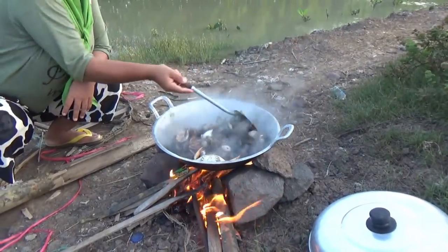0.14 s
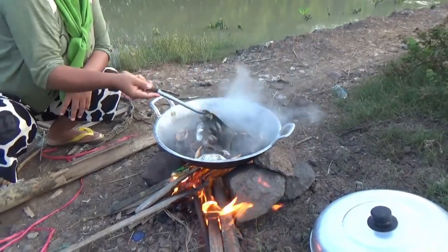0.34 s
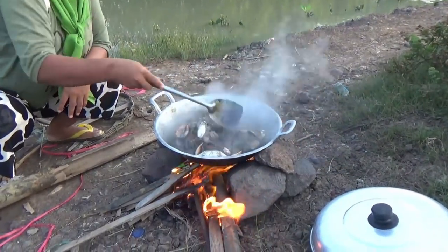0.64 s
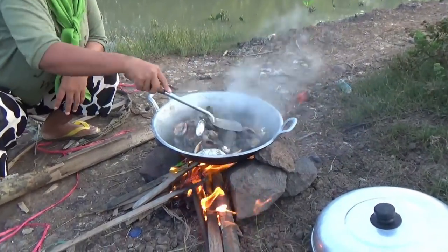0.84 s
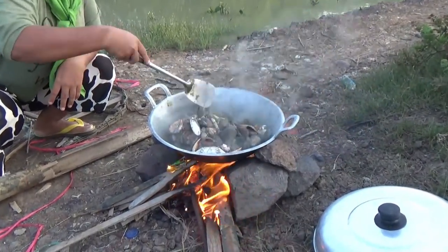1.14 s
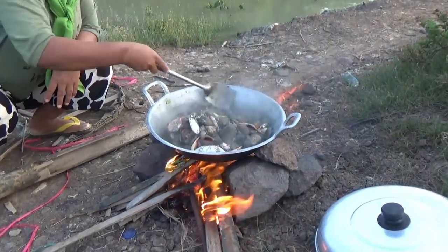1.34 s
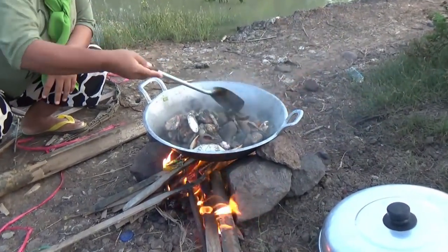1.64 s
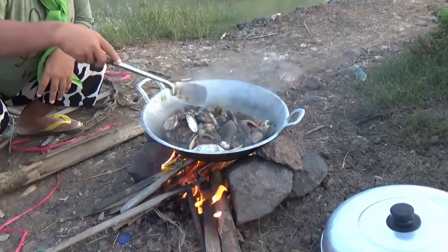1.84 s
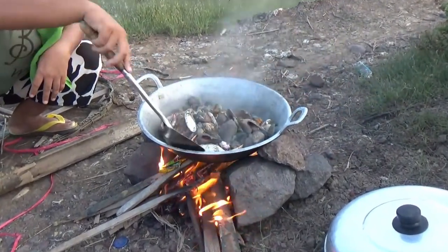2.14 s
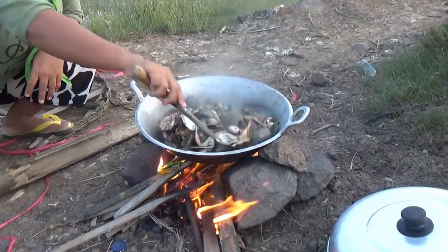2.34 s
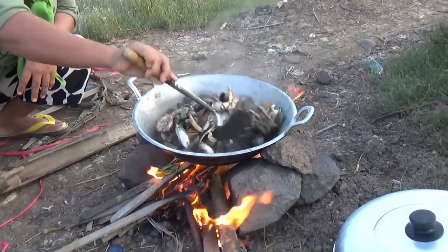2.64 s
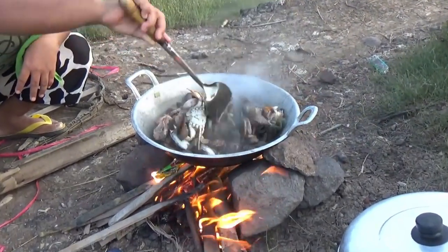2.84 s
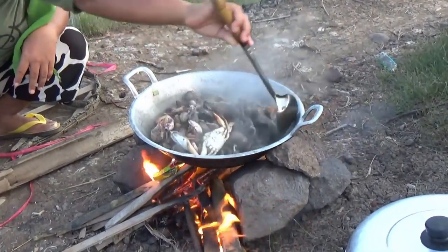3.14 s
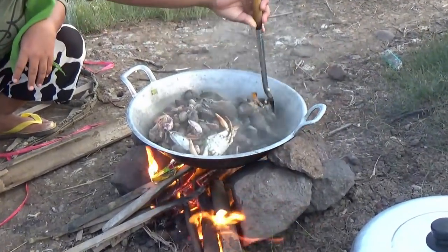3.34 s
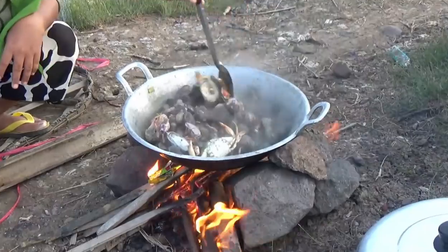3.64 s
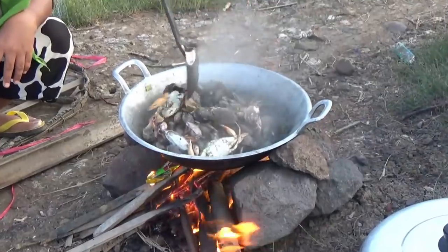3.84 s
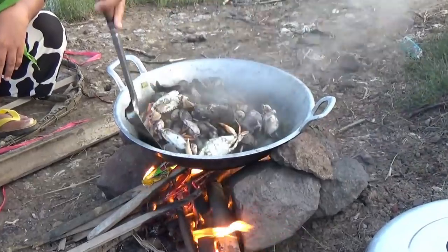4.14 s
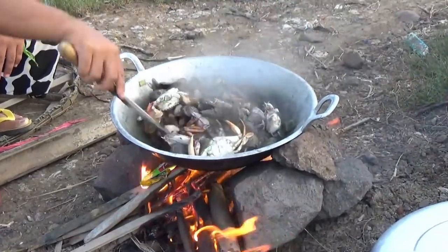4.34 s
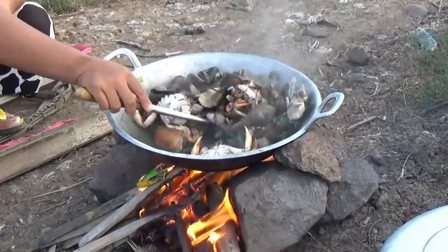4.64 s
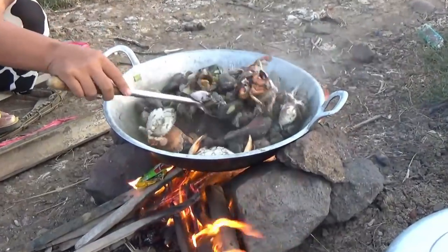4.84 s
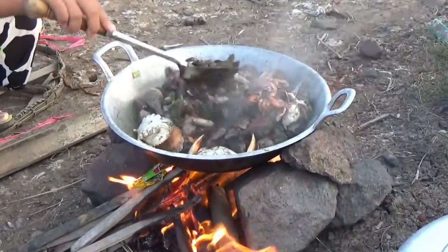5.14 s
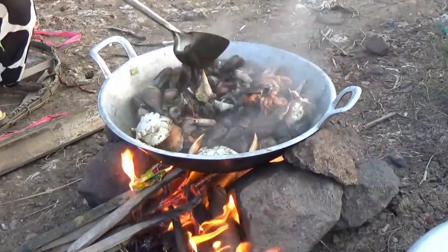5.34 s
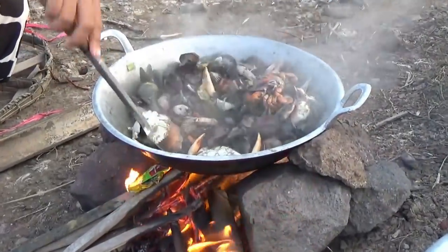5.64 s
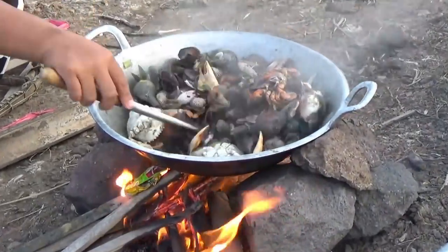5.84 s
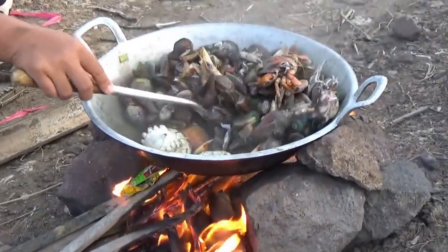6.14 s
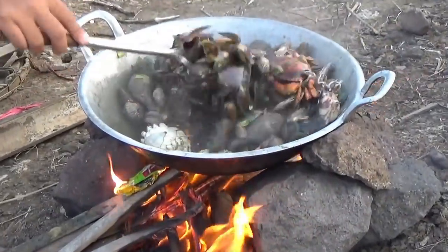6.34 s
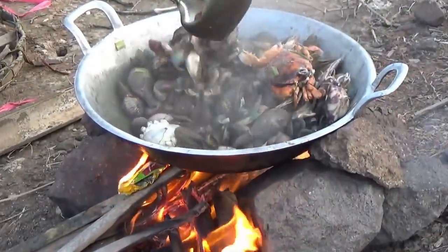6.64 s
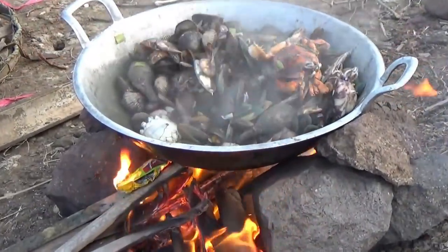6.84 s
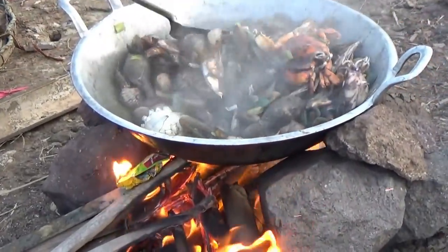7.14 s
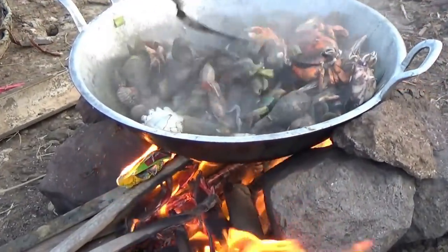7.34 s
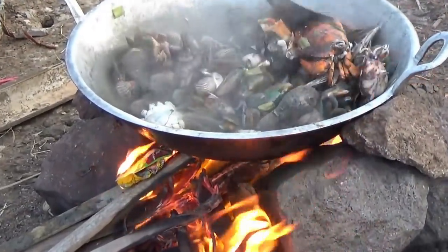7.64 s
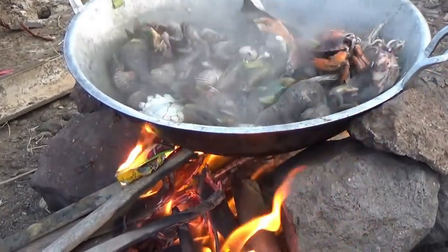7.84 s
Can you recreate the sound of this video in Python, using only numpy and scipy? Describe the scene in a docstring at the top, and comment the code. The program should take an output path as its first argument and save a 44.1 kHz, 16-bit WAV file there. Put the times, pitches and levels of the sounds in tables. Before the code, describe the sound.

A metal spatula clinks and scrapes in a metal wok, turning rattling crabs and clams in a little broth over a low, rumbling wood fire.

```python
"""Turning shellfish in a wok

A steel spatula turns crabs and clams in a cast wok over a wood fire, outdoors.
Blows and shells ring as damped modes; the scraping blade is a dense train of slips driving blade and pan.
Random collisions, rung as short grains, make the rattle of the heap and the slop of the broth.
Throughout, coloured random clicks sizzle faintly and coloured noise rumbles as the fire."""
import sys
import numpy as np
from scipy import signal
from scipy.fft import rfft, irfft
from scipy.io import wavfile
from scipy.ndimage import map_coordinates

SR = 44100
rng = np.random.default_rng(int(sys.argv[2]) if len(sys.argv) > 2 else 0)


def wav_record(signal):
    """Record a signal, one row per channel, as 16-bit PCM in the file named by sys.argv[1]."""
    frames = np.transpose(np.atleast_2d(signal))
    bounded = np.clip(frames, -1, 1)
    # unit amplitude maps onto the largest positive 16-bit level
    quanta = np.round(bounded * 32767).astype(np.int16)
    wavfile.write(sys.argv[1], SR, quanta)


N = 352800
T = np.arange(N) / SR

# modes of the freely ringing wok: [f/Hz, relative level/dB, t60/s]
PAN_MODES = [(314,-36,.9),(608,-26,0.25),(798,-28,.24),(965,-30,.24),(1132,-20,0.34),(1440,-8,0.22),(1826,-1.5,0.37),(2380,-11,0.18),(2763,-8,0.25),(3190,-4,0.21),(3690,-1,0.061),(4000,-3.5,0.067),(4300,-12,0.24),(5046,-3,0.062),(6800,-19,0.14),(6760,-27,.14),(7850,-16,0.17)]
# modes of the freely ringing spatula: [f/Hz, relative level/dB, t60/s]
BLADE_MODES = [(1370,-9,0.17),(2386,2,.14),(2737,-0.5,0.19),(3300,-2,.2),(3750,-2,.14),(4130,-1,0.15),(4570,-0.5,0.19),(5233,-3,0.38),(5491,-15.5,0.3),(6800,-25,.1),(6585,-5,.12),(7360,-18,0.14),(7900,-2,0.19),(8660,-35,0.12),(9200,-10,0.16),(10380,-6,.1)]
# spectrum of the noise in a hard impact: [f/Hz, relative level per Hz/dB]
IMPACT_SPECTRUM = [(300,-40),(900,-10.5),(2000,-9),(3600,-2),(5200,-1),(7500,-6),(10000,-2.5),(13000,-14),(16000,-30.5)]
# pushes of the spatula through the heap, levels before the trims in heap():
# [start t/s, end t/s, shell rattle level/dB, broth slosh level/dB]
PUSHES = [(0, 0.111, -27, -34.5), (0.203, 0.426, -34.5, -41), (0.412, 0.604, -30, -39.5),
          (0.967, 1.175, -38, -48), (1.497, 1.908, -33.5, -38), (2.42, 3.04, -30.5, -39.5),
          (3.078, 3.22, -32.5, -39), (3.392, 3.974, -28, -34.5), (4.024, 4.244, -37.5, -36.5),
          (4.441, 5.01, -28.5, -28.5), (5.02, 5.57, -34.5, -40), (5.85, 6.307, -30.5, -30),
          (6.358, 6.882, -32.5, -36), (7.295, 7.501, -28, -37), (7.851, 8, -30, -36.5)]


def from_db(db):
    """Amplitude is ten to the power of level over twenty."""
    return 10 ** (np.asarray(db) / 20)


def rms_one(x):
    """Normalisation to unit mean power."""
    return x / np.sqrt(np.mean(x ** 2) + 1e-20)


def gain_at(points, hz):
    """Gain from (f/Hz, level/dB) points, interpolated on a log-frequency axis."""
    f, db = np.transpose(points)
    return from_db(np.interp(np.log(hz + 1), np.log(f), db))


def colour(x, spectrum):
    """Minimum-phase filtering: folding the cepstrum makes the response causal."""
    cepstrum = irfft(np.log(gain_at(spectrum, np.fft.rfftfreq(N, 1 / SR))))
    cepstrum[1:N // 2] *= 2
    cepstrum[N // 2 + 1:] = 0
    response = irfft(np.exp(rfft(cepstrum)))
    return irfft(rfft(x, 2 * N) * rfft(response, 2 * N))[:N]


def drift(rate):
    """Slow random modulation of unit rms, joining `rate` random points per second."""
    knots = rng.standard_normal(int(rate * N / SR) + 2)
    return rms_one(np.interp(T * rate, np.arange(len(knots)), knots))


def fade(t, t60):
    """Exponential decay, falling 60 dB in t60 seconds."""
    return np.exp(-np.log(1000) * t / max(t60, 1e-3))


def ring(force, hz, t60):
    """Damped resonator: a unit click sets a sine of initial height 1 ringing."""
    radius, angle = fade(1 / SR, t60), 2 * np.pi * hz / SR
    numerator = [0, np.sin(angle)]
    denominator = [1, -2 * radius * np.cos(angle), radius * radius]
    return signal.lfilter(numerator, denominator, force + 1e-18)


def add(out, s, sound):
    """Superposition of a sound that starts at s seconds."""
    at = max(round(s * SR), 0)
    out[at:at + len(sound)] += sound[:N - at]


def contacts(per_s, spread_db):
    """Random train of tiny collisions, of uneven size and either sign."""
    sizes = from_db(spread_db * np.minimum(rng.exponential(1, N), 3.5))
    return sizes * rng.choice([-1, 1], N) * (rng.random(N) < per_s / SR)


def grains(clicks, low_hz, high_hz, cycles, count=22):
    """Granular excitation: each collision rings one small body; the power per Hz is even."""
    dealt = rng.integers(0, count, N)
    total = np.zeros(N)
    for k, hz in enumerate(np.geomspace(low_hz, high_hz, count)):
        total += hz * ring(clicks * (dealt == k), hz, cycles / hz)
    return rms_one(total)


def struck(modes, blows, uneven_db):
    """Modal excitation: every blow lands elsewhere and so drives each mode with another strength."""
    out = np.zeros(N)
    at = (blows[:, 0] * SR).astype(int)
    for hz, db, t60 in modes:
        unevenness = uneven_db * rng.standard_normal(len(at))
        force = np.zeros(N)
        force[at] = from_db(blows[:, 1] + db + unevenness) * rng.choice([-1, 1], len(at))
        out += ring(force, hz, t60)
    return out


def spatula_blows(chatter_t60=0.047, chatter_db=-6.5):
    """Impact: the edge chatters briefly on the pan, and the modes of pan and blade ring on."""
    # spatula meets the pan: [t/s, impact level before chatter_db/dB, pan ring level/dB, blade ring level/dB]
    blow_list = [(0.681,-14,-28,-39),(.889,-28,-62,-39),(1.226,-46,-61,-40.5),(1.282,-45,-54,-39),(1.293,-12,-50,-25),(1.301,-9.5,-54,-24.5),(1.389,-16.5,-60,-29),(1.526,-8.5,-44,-26.5),(1.839,-4.5,-54,-32),(1.906,-37,-57,-37.5),(2.166,-27,-53,-58),
                 (2.347,-13.5,-42,-29.5),(2.626,-2,-16.5,-32),(2.911,-27,-32,-44),(3.091,-14.5,-63,-29),(3.151,-6.5,-11,-39),(3.338,-3,-29.5,-21.5),(4.138,-2.5,-12.5,-34),(4.329,-2.5,-45,-25.5),
                 (5.617,-17,-43,-41),(5.818,-3.5,-53,-27),(7.233,-22,-22,-49),(7.845,-5.5,-34,-32)]
    blows, chatter = np.array(blow_list), np.zeros(N)
    for s, db, _, _ in blow_list:
        add(chatter, s, from_db(db + chatter_db) * fade(T[:SR // 4], chatter_t60))
    chatter *= rms_one(colour(rng.standard_normal(N), IMPACT_SPECTRUM))
    pan = struck(PAN_MODES, blows[:, [0, 2]], uneven_db=1.5)
    blade = struck(BLADE_MODES, blows[:, [0, 3]], uneven_db=2.5)
    return chatter + pan + blade


def scrapes(blade_db=-10.0, damping=0.27, judder_db=3.5, edge_s=0.0079, muffled_db=3.5, pan_db=6.0):
    """Friction: dense slips drive blade and pan, both damped by contact; shells under the blade muffle it."""
    # blade sliding: [start t/s, end t/s, relative level at start/dB, relative level at end/dB,
    # bite/1 from 0, muffled among shells, to 1, edge on bare metal]
    slide_list = [(0,0.057,-16,-28,0.89),(0.065,0.223,-49,-35.5,0.81),(0.458,0.572,-22,-52,0.83),(0.893,0.934,-34,-35,0.67),(1.102,1.132,-19.5,-37,0.89),(1.161,1.195,-16,-34.5,1),(1.517,1.675,-25,-38,0.79),(2.346,2.414,-19.5,-24,0.96),(2.409,2.459,-11,-16,1),
                  (2.461,2.52,-23,-22.5,0.88),(3.335,3.511,-21,-25,1),(3.83,3.892,-27,-64,1),(4.333,4.448,-15,-20.5,0.97),(4.458,4.506,-22,-28.5,1),(4.51,4.688,-17.5,-42.5,0.87),(5.032,5.124,-33.5,-36,0.85),(5.826,5.86,-6,-28,1),(5.881,6.045,-24.5,-25,0.95),(7.23,7.32,-17.5,-30,0.43),(7.845,7.886,-31,-44.5,0.17)]
    # edge on bare metal: [f/Hz, relative level per Hz/dB]
    bare_spectrum = [(300,-40),(900,-71),(1500,10.5),(2600,4),(3600,12),(6400,7.5),(7400,2.5),(8600,6),(10300,10),(12500,-3),(14500,-6),(16000,-34)]
    # blade among shells: [f/Hz, relative level per Hz/dB]
    muffled_spectrum = [(250,-35),(480,-2.5),(760,-7.5),(950,3.5),(1250,0),(1600,6),(2400,-2),(4000,1),(9000,4.5),(16000,-34)]

    on_metal, on_shells = np.zeros((2, N))
    for start, end, first_db, last_db, bite in slide_list:
        envelope = np.clip(np.minimum(T - start, end - T) / edge_s + .5, 0, 1)
        pressure = from_db(np.interp(T, [start, end], [first_db, last_db])) * envelope
        on_metal += pressure * np.sqrt(bite)
        on_shells += pressure * (1 - bite)
    judder = from_db(judder_db * (drift(220) + drift(45)))
    grit = rms_one(contacts(per_s=14000, spread_db=1.5) * judder)

    # each slip runs to both ends of the blade and back; the contact point wanders, so the resonances glide
    singing = grit
    for round_trip_s in (.00088, .0023):
        when = T - round_trip_s * (1 + .035 * drift(9))
        echo = singing
        for _ in range(3):
            echo = .5 * map_coordinates(echo, [when * SR], order=3)
            singing = singing + echo
    slips, crunch = rms_one(singing) * on_metal, grit * on_shells

    def driven(force, modes):
        """Forced vibration: contact shortens each ring, and the modes keep half their level in dB."""
        return rms_one(sum(ring(force, hz, t60 * damping) * from_db(db / 2) for hz, db, t60 in modes))

    bright = rms_one(colour(slips, bare_spectrum))
    bright = bright + from_db(blade_db) * driven(grit * on_metal, BLADE_MODES)
    dull = colour(crunch, muffled_spectrum)
    dull = rms_one(dull) + from_db(pan_db) * driven(dull, PAN_MODES)
    return slips.std() * bright + from_db(muffled_db) * crunch.std() * dull


def clacks(crack_db=-11.98, crack_t60=0.0065, side_db=-10.5, heap_db=-10.5, heap_t60=0.027, rise_s=0.00007):
    """Impact: a shell cracks on its neighbour, rings in a few damped modes and shakes the heap."""
    # single shells knocking: [t/s, peak level/dB, pitch f/Hz, ring t60/s]
    clack_list = [(0.1037, -4.5, 4240, 0.013), (.3658, -13, 4070, .01), (.4569, -2, 10380, .011),
                  (0.517, -11, 3900, 0.026), (.5346, -4, 4180, .018), (0.5902, -5.5, 4950, 0.0045),
                  (.626, -14.5, 3600, 0.025), (.6808, -4, 4090, 0.036), (0.687, -1.5, 3800, 0.045),
                  (0.763, -13, 6120, 0.018), (0.8882, -2.5, 4010, 0.017), (0.9963, -2.5, 5240, 0.0027),
                  (1.0625, -17, 9800, .01), (1.1672, -10, 5090, 0.026), (1.4905, -15, 4420, 0.0098),
                  (1.7, -7.5, 1640, 0.034), (1.726, -8, 3330, 0.0078), (1.751, -8, 3180, 0.016),
                  (1.8716, -13.5, 3560, 0.028), (1.9079, -9.5, 6530, .017), (1.9722, -5, 1400, 0.0027),
                  (2.4076, -3, 6080, .025), (2.4263, -5, 3620, 0.021), (2.497, -11, 4480, .013),
                  (2.574, -7.5, 9760, 0.0064), (2.6897, -8.5, 4470, 0.023), (2.8247, -15, 3480, 0.019),
                  (2.91, -5.5, 3950, 0.039), (2.9726, -5, 3940, 0.02), (3.0304, -3, 3300, 0.0075),
                  (3.2909, -10, 4260, 0.023), (3.4574, -8, 4880, 0.083), (3.5733, -3.5, 10200, 0.004),
                  (3.6639, -6, 3800, 0.0066), (3.7212, -7, 5640, 0.0041), (3.867, -11, 3080, 0.016),
                  (3.885, 1, 3430, 0.0084), (4.035, -13.5, 2470, .031), (4.0952, -5, 4170, 0.0074),
                  (4.239, -4.5, 3120, 0.0026), (4.4303, 0.5, 5150, 0.0062), (4.4634, -5.5, 2550, 0.014),
                  (4.519, -5, 1770, 0.026), (4.764, -2, 7100, 0.016), (4.7706, -7, 8160, 0.0094),
                  (4.7744, -8, 6500, .012), (4.953, -8.5, 1890, 0.0065), (5.016, -0.5, 3600, 0.0047),
                  (5.0952, -5, 6200, 0.0051), (5.1164, -8.5, 4180, .036), (5.1302, -2, 7950, 0.0056),
                  (5.1771, -5.5, 4400, 0.021), (5.2822, -10.5, 3320, 0.0083), (5.3033, -12, 6480, 0.027),
                  (5.392, -8, 4040, 0.005), (5.434, -14, 5000, 0.0068), (5.4104, -6.5, 4800, 0.0023),
                  (5.4658, -4, 6860, 0.004), (5.4997, -7, 5710, .02), (5.5087, -2.5, 5070, 0.0061),
                  (5.577, -5, 4750, 0.0084), (5.617, -6, 4600, .03), (5.696, -11, 4930, 0.027),
                  (5.7113, -3.5, 5070, 0.032), (5.8054, -3.5, 3740, 0.017), (5.826, -7, 3900, 0.03),
                  (5.9121, -4.5, 5440, 0.0058), (6.154, .5, 3300, .007), (6.582, -6.5, 3010, 0.025),
                  (6.6222, -11.5, 2300, 0.034), (6.6332, -9, 2220, 0.031), (6.683, -3.5, 3190, 0.021),
                  (6.7552, -5, 3680, 0.0054), (6.7963, -9, 4020, 0.021), (6.8853, 3, 3900, 0.0022),
                  (7.0326, -7.5, 8260, 0.0066), (7.2216, -3, 4200, .003), (7.3646, -8, 5230, 0.022),
                  (7.4059, -7.5, 3140, 0.042), (7.495, -1, 3230, 0.0038), (7.551, -8, 3220, 0.0033),
                  (7.5685, -2, 4400, .024), (7.615, -16, 9000, 0.032), (7.9384, -5, 5200, .0085)]
    out, t = np.zeros(N), T[:SR // 10]
    hiss = rms_one(colour(rng.standard_normal(N), IMPACT_SPECTRUM))
    for s, db, hz, t60 in clack_list:
        # six weaker modes fall at random around the pitch
        side_hz = rng.uniform(0.614 * hz, min(1.5 * hz, 11000), 6)
        side = rng.choice([-1, 1], 6) @ np.sin(2 * np.pi * np.outer(side_hz, t))
        body = np.sin(2 * np.pi * hz * t) + from_db(side_db) * side
        grit = hiss[rng.integers(N - len(t)):][:len(t)]
        crack = from_db(crack_db) * fade(t, crack_t60)
        shaking = from_db(heap_db) * fade(t, heap_t60)
        knock = body * fade(t, t60) + grit * (crack + shaking)
        knock *= 1 - np.exp(-t / rise_s)
        knock *= from_db(db) / np.abs(knock).max()
        add(out, s, knock)
    return out


def thuds(cycles=17.0, upper_ratio=1.58, upper_db=-5.5, rise_s=0.00027):
    """Damped resonance: a dull, hollow knock of two partials rings for a few cycles."""
    # heavy pieces dropping, and at 7.23 s the pan's dull knock as the blade pushes into the heap:
    # [t/s, level of the lower partial/dB, pitch f/Hz]
    thud_list = [(.047,-13.5,885),(0.058,-21.5,493),(1.972,-18,610),(1.979,-24.5,182),(4.934,-19.5,530),(5.2,-14.5,1440),(5.224,-16.5,880),(6.038,-13,980),(6.156,-20,550),(6.7549,-9,572),(6.768,-21,515),(6.887,-16.5,578),(6.429,-12,1780),(7.233,-21,1010),(7.25,-13,1190)]
    out, t = np.zeros(N), T[:SR // 8]
    for s, db, hz in thud_list:
        phase = 2 * np.pi * hz * t
        body = np.sin(phase) + from_db(upper_db) * np.sin(upper_ratio * phase)
        envelope = fade(t, cycles / hz) * (1 - np.exp(-t / rise_s))
        add(out, s, from_db(db) * body * envelope)
    return out


def pushed(levels_db, sag_db_per_s, rest_db, attack_s=0.068, settle_db_per_s=113):
    """Sum of powers: each push moves the heap, weakens as the blade unloads, and dies away after it stops."""
    power = from_db(rest_db) ** 2
    for (start, end, _, _), level_db in zip(PUSHES, levels_db):
        since, after = np.maximum(T - start, 0), np.maximum(T - end, 0)
        db = level_db - sag_db_per_s * since - settle_db_per_s * after
        power = power + (np.minimum(since / attack_s, 1) * from_db(db)) ** 2
    return np.sqrt(power)


def heap(rattle_db=1.5, slosh_db=-2.5, snap_db=-25.0, rub_db=-4.0):
    """Random collisions: small shells tick and rub, bigger ones tumble, and broth squelches between them."""
    # shell rattle: [f/Hz, relative level per Hz/dB]
    rattle_spectrum = [(700,-28.5),(1500,-3),(2400,-2),(4000,4),(6000,-2),(8000,-7),(10200,-3),(12500,-13.5),(16000,-22)]
    # broth slosh: [f/Hz, relative level per Hz/dB]
    slosh_spectrum = [(150,2.5),(330,-11),(540,2.5),(740,-7.5),(1000,-2),(1500,-3),(2400,-8.5),(5000,-51)]
    _, _, shells_db, broth_db = np.transpose(PUSHES)

    ticks = contacts(per_s=600, spread_db=5.5)
    # a shell touches down three times in quick succession, each time at another spot
    ticks = ticks + .8 * np.roll(ticks, SR // 900) - .6 * np.roll(ticks, SR // 350)
    shells = grains(ticks, 1200, 12000, cycles=26)
    shells = shells + from_db(snap_db) * rms_one(ticks) + from_db(rub_db) * rng.standard_normal(N)
    tumbling = grains(contacts(per_s=170, spread_db=3.5), 700, 2600, cycles=20)
    broth = grains(contacts(per_s=1500, spread_db=4.0), 260, 2200, cycles=11) + .7 * tumbling

    # the rest levels, also before the trims, are shells shifting in the simmer
    rattle = pushed(shells_db, sag_db_per_s=3, rest_db=-52.5) * rms_one(colour(shells, rattle_spectrum))
    slosh = pushed(broth_db, sag_db_per_s=5, rest_db=-53) * rms_one(colour(broth, slosh_spectrum))
    return from_db(rattle_db) * rattle + from_db(slosh_db) * slosh


def hearth(sizzle_db=-49.5, fire_db=-43.0):
    """Stationary noise: random clicks make the fine sizzle of the broth, low noise the rumble of the fire."""
    # broth sizzle: [f/Hz, relative level per Hz/dB]
    sizzle_spectrum = [(400,-18),(1000,-7.5),(2300,13),(3100,-2),(6200,5),(8700,13),(10500,13),(13000,7),(16000,0),(20000,-56)]
    # fire rumble: [f/Hz, relative level per Hz/dB]
    fire_spectrum = [(12,-47),(25,-12),(40,-15.5),(67,2),(85,-2),(120,-1),(175,-3.5),(260,-11),(500,-15),(800,-18),(2000,-31),(6000,-62)]
    sizzle = colour(contacts(per_s=3900, spread_db=4.0), sizzle_spectrum)
    fire = colour(rng.standard_normal(N), fire_spectrum)
    return from_db(sizzle_db) * rms_one(sizzle) + from_db(fire_db) * rms_one(fire)


def scene(scatter_t60=0.035):
    """Two-port reception and scattering: the wok is a little to one side; ground and stones return a little."""
    # difference between two close ports relative to their sum: [f/Hz, level/dB]
    port_difference = [(25,-23),(80,-17.5),(170,-12),(350,-5.5),(700,-2),(1400,-2.5),(2900,-6.5),(5500,-10),(9500,-17),(14000,-38)]
    mid = spatula_blows() + scrapes() + clacks() + thuds() + heap() + hearth()
    # the ports hear the sound a moment apart: their difference is a quarter cycle off their sum
    difference_gain = gain_at(port_difference, np.fft.rfftfreq(2 * N, 1 / SR))
    side = irfft(1j * difference_gain * rfft(mid, 2 * N))[:N]

    t = T[:SR // 4]
    echoes = rng.standard_normal((2, len(t))) * fade(t, scatter_t60) * (t > .002)
    echoes /= np.linalg.norm(echoes, axis=1, keepdims=True)
    # scattering loses the bass and the treble
    band = signal.butter(1, [200, 5000], "band", fs=SR, output="sos")
    echoes = from_db(-15) * signal.sosfilt(band, echoes)
    scattered = signal.fftconvolve(mid[None], echoes, axes=1)[:, :N]
    return np.array([mid + side, mid - side]) + scattered


def record(dry):
    """Saturation and band limiting: the highest peaks are rounded; the deepest bass and the top are cut."""
    rounded = dry / (1 + (dry / .92) ** 6) ** (1 / 6)
    bass_cut = signal.butter(2, 30, "high", fs=SR, output="sos")
    top_cut = signal.ellip(10, .1, 80, 16000, fs=SR, output="sos")
    return signal.sosfilt(top_cut, signal.sosfilt(bass_cut, rounded))


dry = scene()
out = record(dry)
wav_record(out)
```